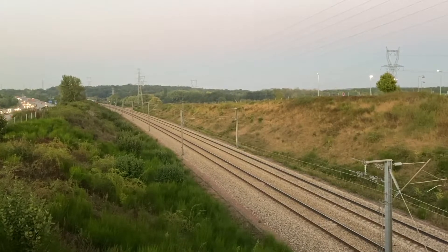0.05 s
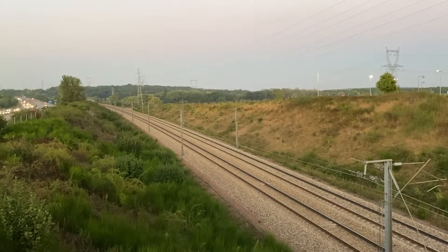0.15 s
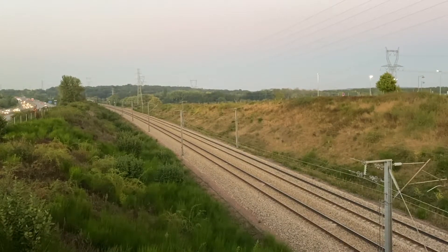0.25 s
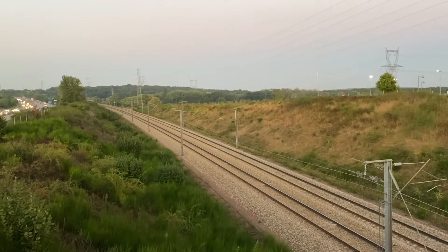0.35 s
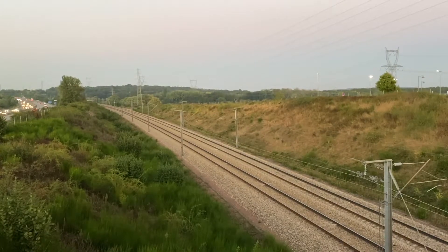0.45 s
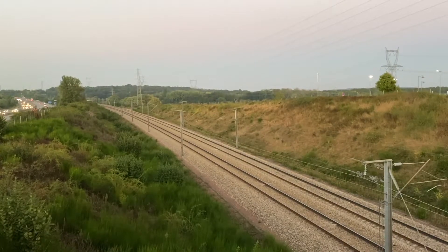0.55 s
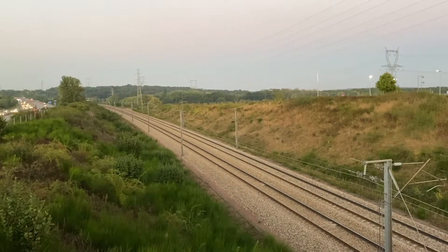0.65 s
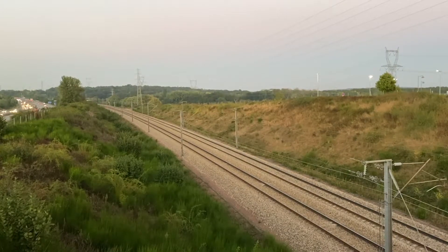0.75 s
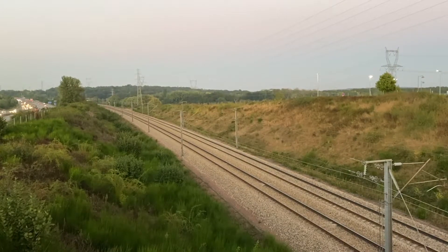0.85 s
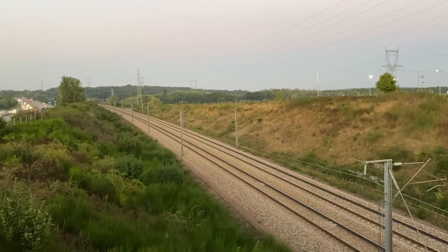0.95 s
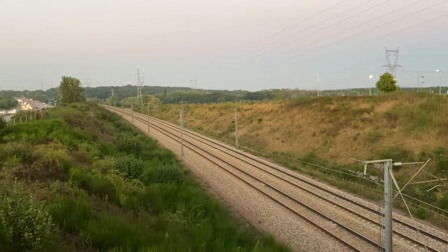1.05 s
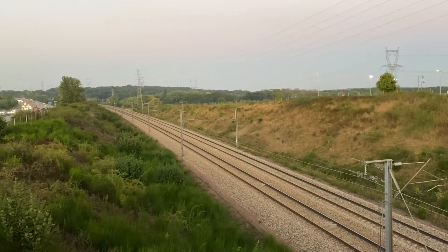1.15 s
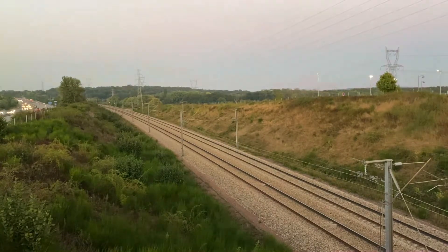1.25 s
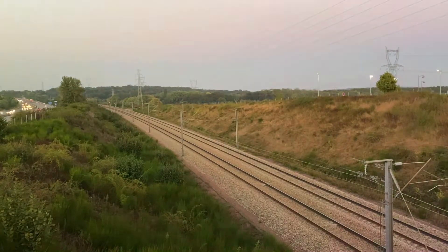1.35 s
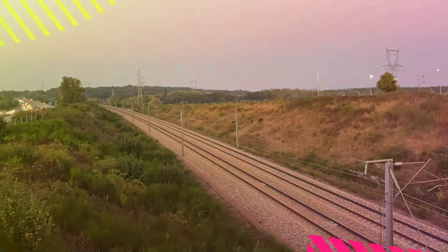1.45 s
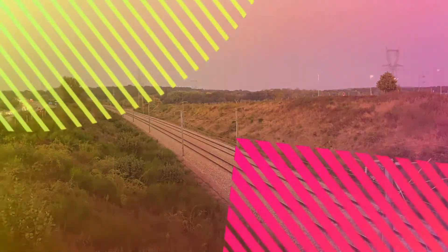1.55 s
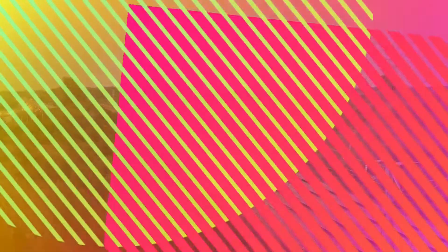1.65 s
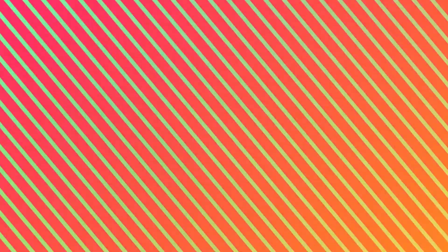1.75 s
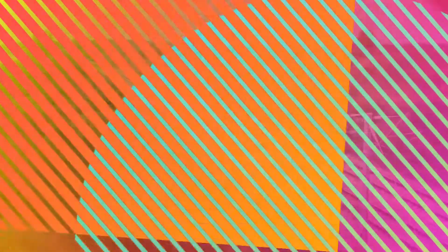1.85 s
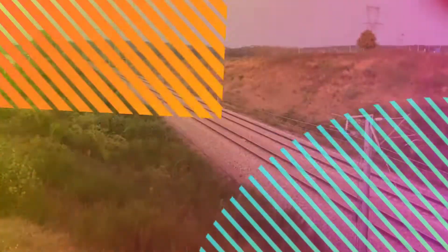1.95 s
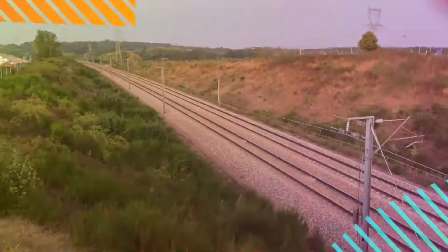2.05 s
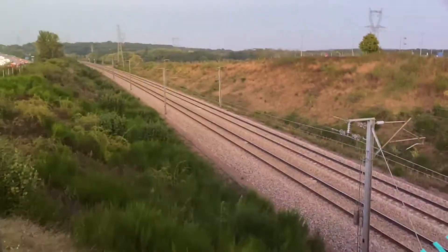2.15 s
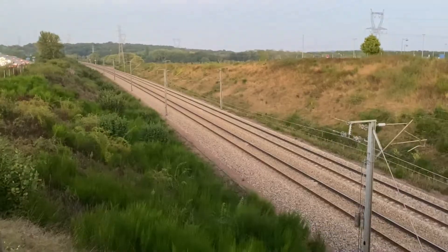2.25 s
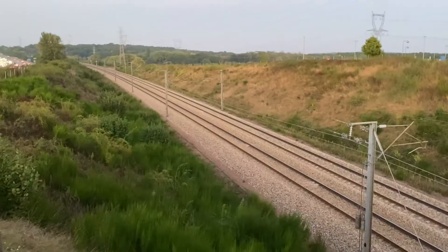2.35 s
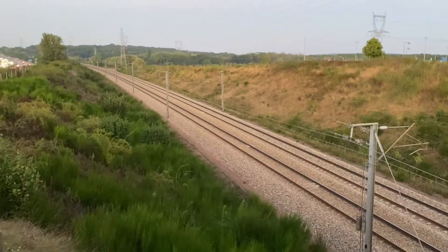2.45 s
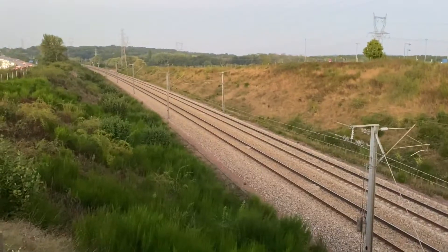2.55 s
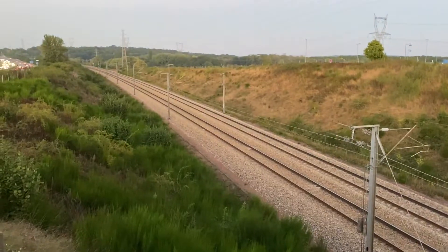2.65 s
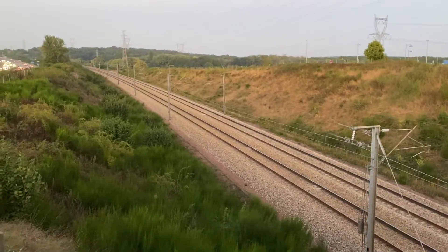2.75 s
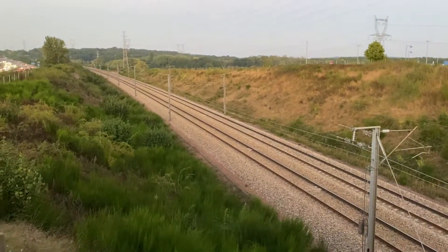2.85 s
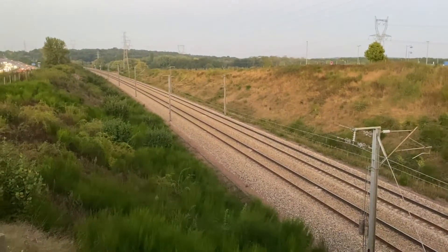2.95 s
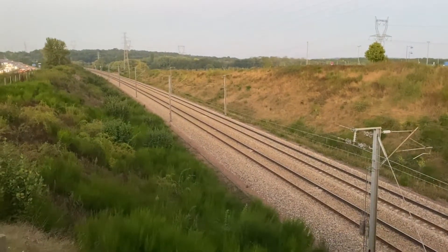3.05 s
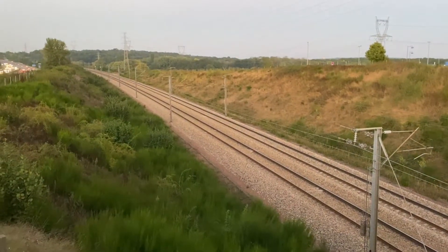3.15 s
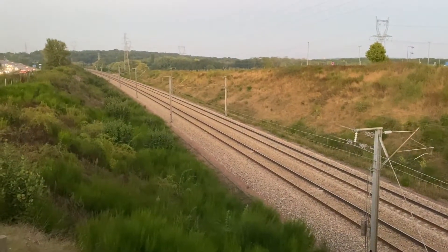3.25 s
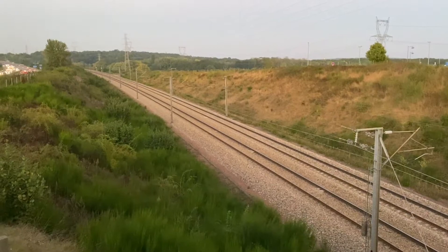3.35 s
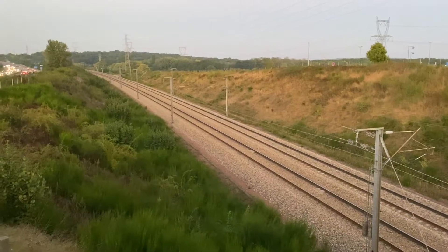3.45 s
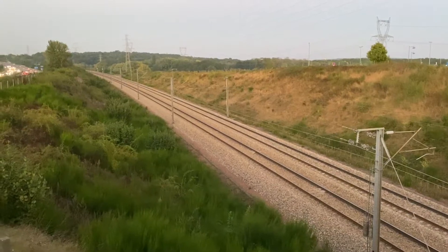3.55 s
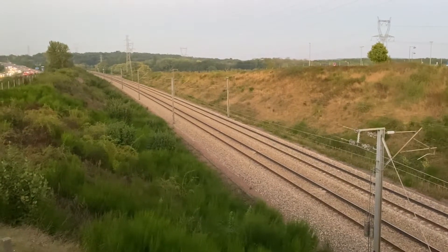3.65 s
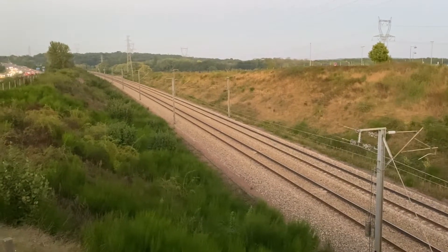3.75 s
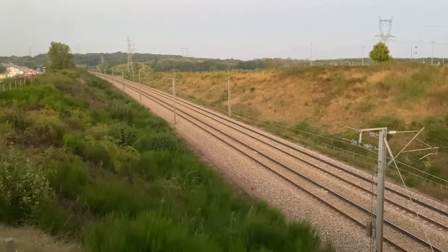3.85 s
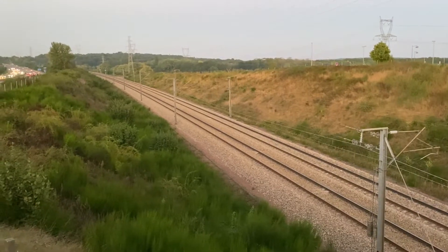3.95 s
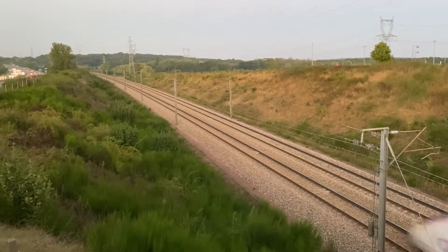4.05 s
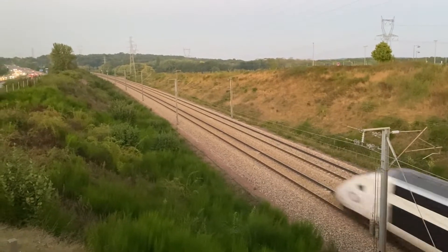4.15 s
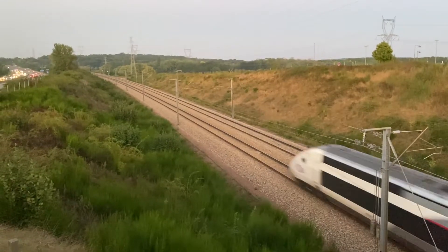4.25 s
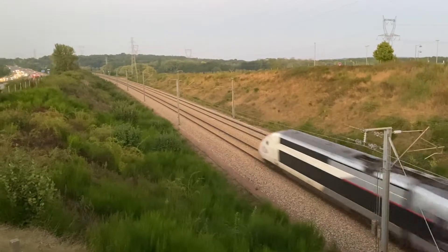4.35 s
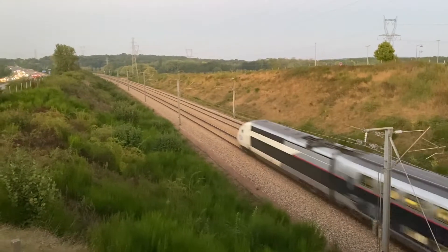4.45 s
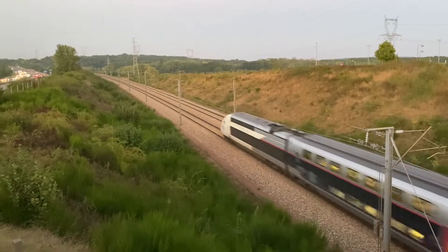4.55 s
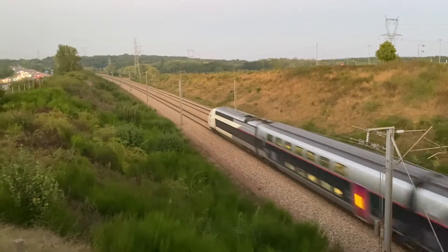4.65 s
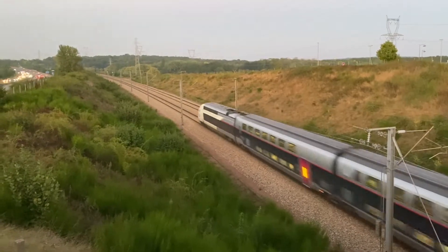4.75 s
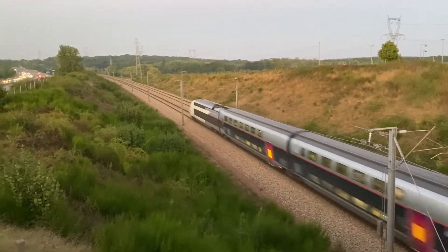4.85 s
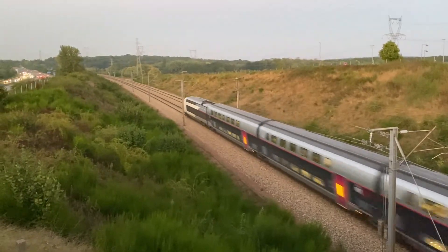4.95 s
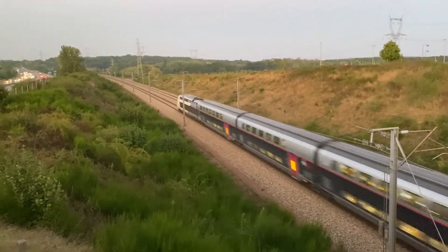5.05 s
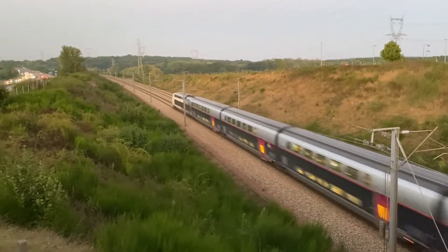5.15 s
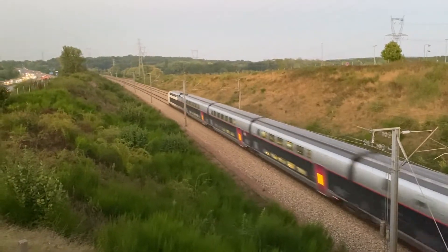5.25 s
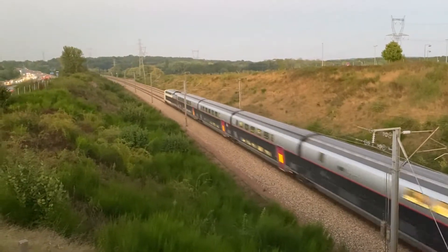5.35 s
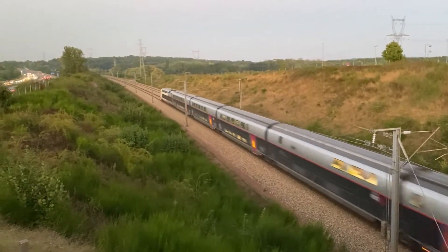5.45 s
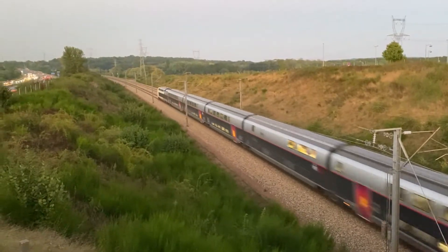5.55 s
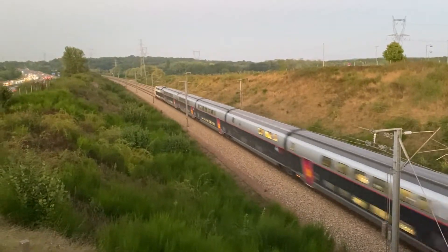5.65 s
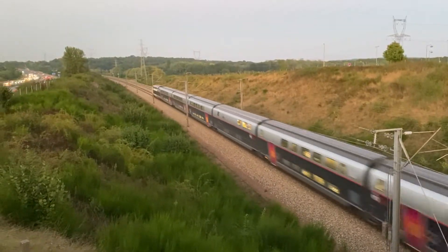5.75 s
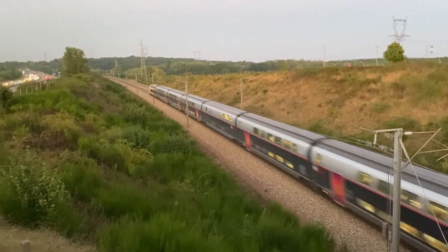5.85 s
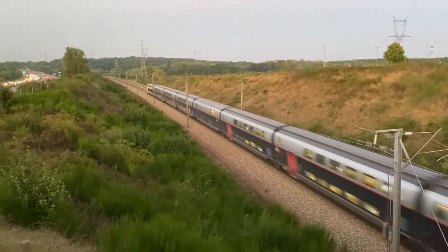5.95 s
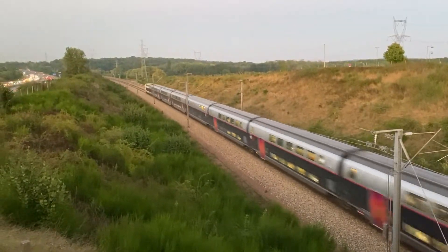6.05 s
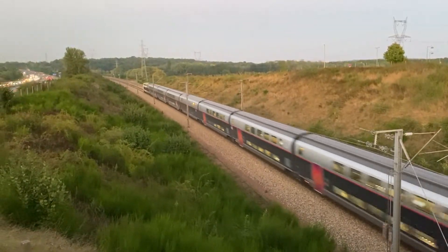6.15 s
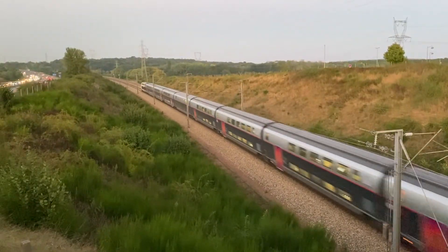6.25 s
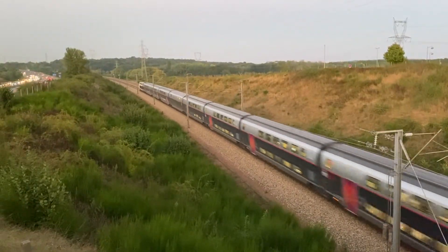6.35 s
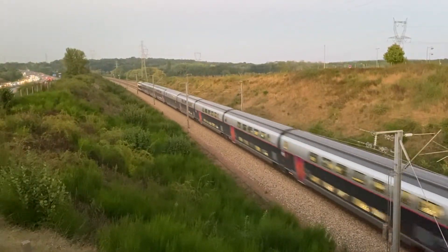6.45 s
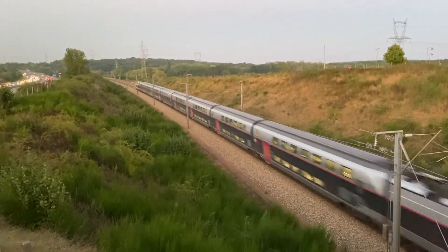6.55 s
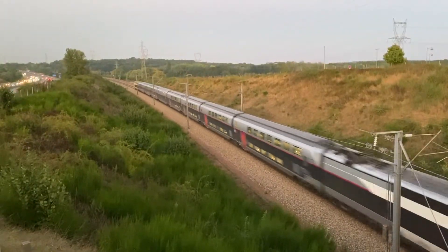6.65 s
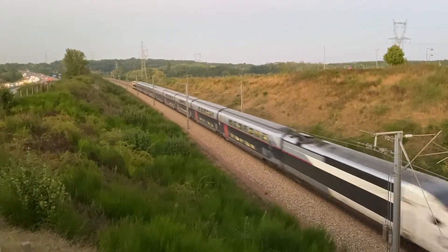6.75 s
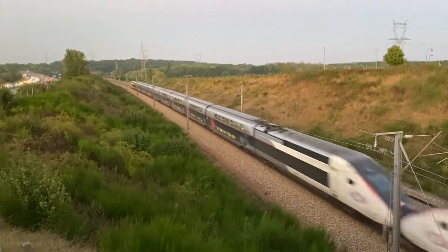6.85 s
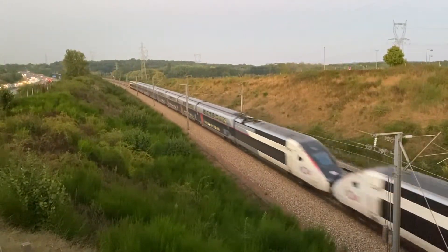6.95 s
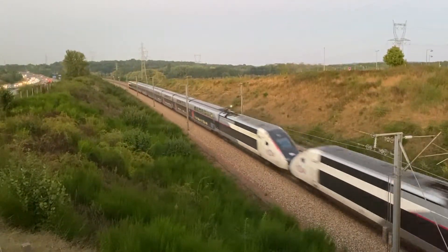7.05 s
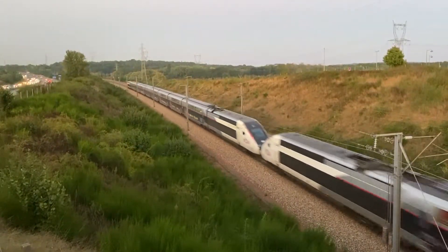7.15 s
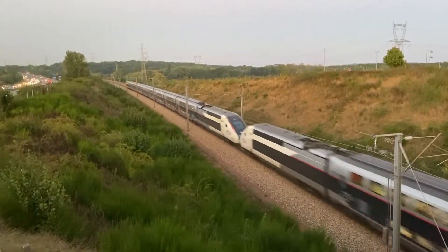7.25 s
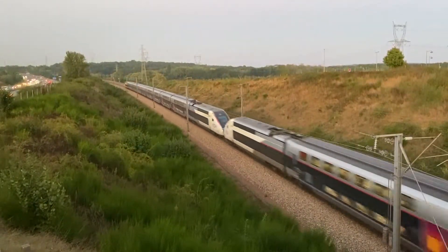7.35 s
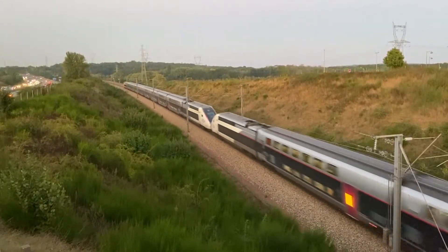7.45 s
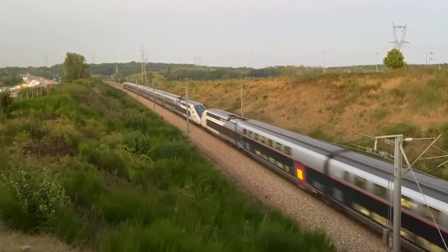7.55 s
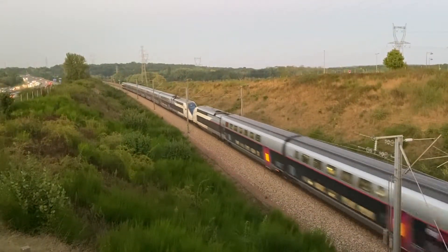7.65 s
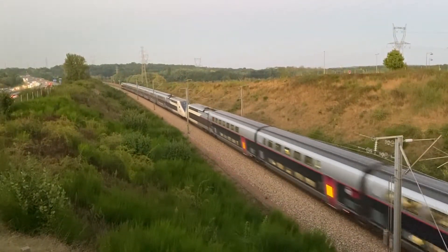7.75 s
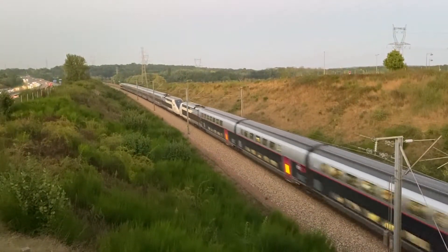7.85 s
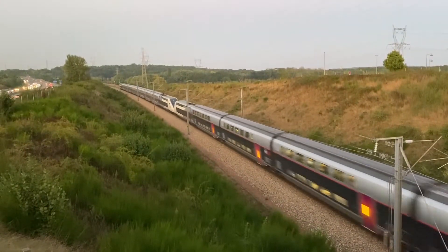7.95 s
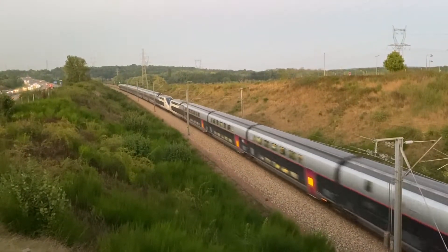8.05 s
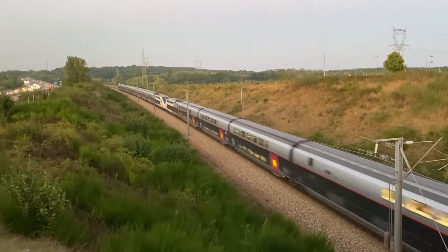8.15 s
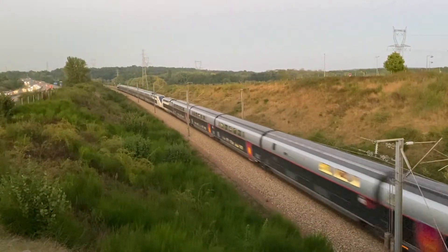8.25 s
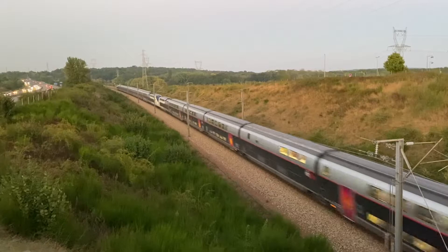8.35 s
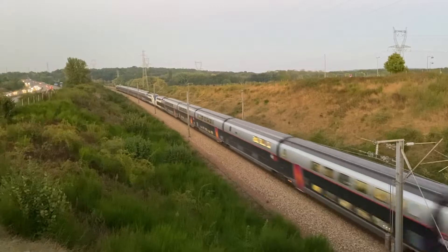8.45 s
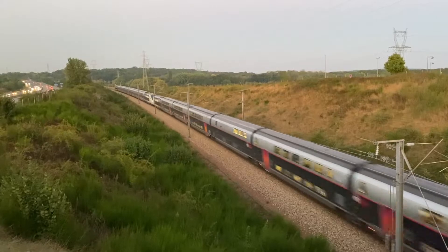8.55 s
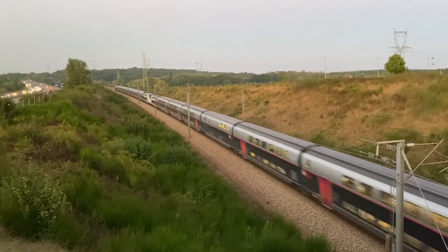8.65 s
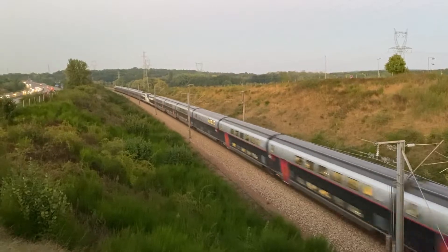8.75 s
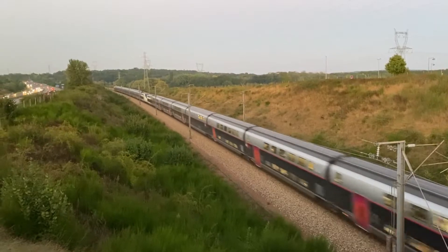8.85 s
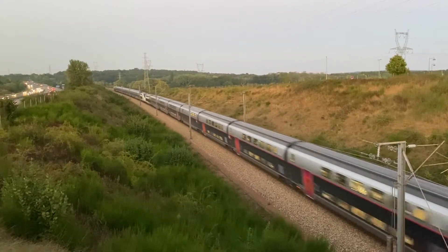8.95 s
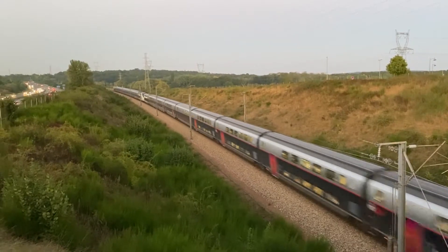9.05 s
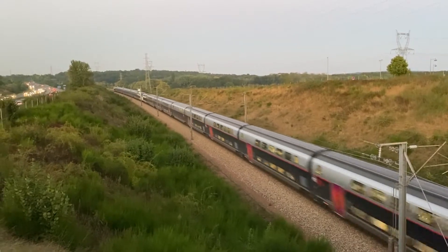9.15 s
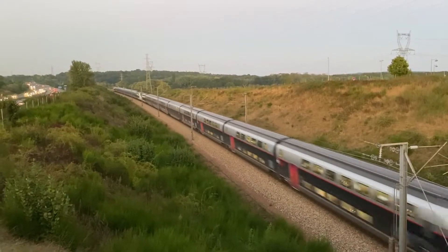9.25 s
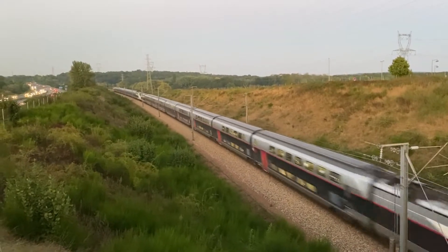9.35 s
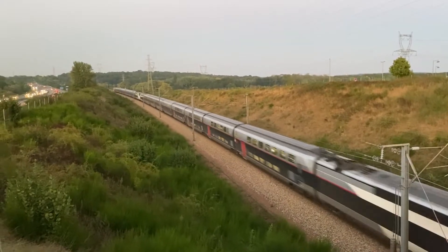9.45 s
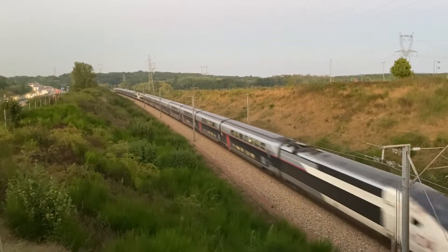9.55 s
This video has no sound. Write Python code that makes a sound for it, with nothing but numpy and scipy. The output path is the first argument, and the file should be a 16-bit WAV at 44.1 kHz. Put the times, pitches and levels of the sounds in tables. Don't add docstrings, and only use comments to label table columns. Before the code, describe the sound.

Distant traffic wash, then thin metallic rail singing, a falling howl, and a long fast train roaring by with squealing, thumping wheels.

```python
import sys
import numpy as np
from scipy import signal
from scipy.fft import rfft, irfft, next_fast_len
from scipy.io import wavfile
from scipy.ndimage import uniform_filter1d, minimum_filter1d

SR = 44100
rng = np.random.default_rng(int(sys.argv[2]) if len(sys.argv) > 2 else 0)


def generate_wav(sig):
    pcm = np.round(np.clip(np.atleast_2d(sig).T, -1, 1) * 32767).astype(np.int16)
    wavfile.write(sys.argv[1], SR, pcm)


def magnitude_from_level(level_db):
    exponent = np.asarray(level_db, float) / 20
    return 10 ** exponent


N = 423360
HOP = 128
WINDOW = 8 * HOP
FRAMES = np.arange(N // HOP + 5) * HOP / SR
BINS = np.fft.rfftfreq(WINDOW, 1 / SR)
CHANGE_S, CHANGE_OUT_S, CHANGE_IN_S = 1.768, .024, .028


def evened(x):
    return x / np.sqrt(np.mean(x ** 2) + 1e-20)


def read(points, column=1):
    rows = np.transpose(points)
    return np.interp(np.log(BINS + 1), np.log(rows[0] + 1), rows[column])[:, None]


def follow(rows, column=1, rise_s=0.0089):
    rows = np.transpose(rows)
    t = np.arange(N) / SR
    fade_in = np.clip((t - rows[0, 0]) / rise_s + .5, 0, 1)
    return magnitude_from_level(np.interp(t, rows[0], rows[column])) * fade_in


def per_sample(frame_gain):
    return np.interp(np.arange(N) / SR, FRAMES, frame_gain)


def tilted(x, above_hz, gain):
    highpass = signal.butter(2, above_hz, "high", fs=SR, output="sos")
    return x + (gain - 1) * signal.sosfiltfilt(highpass, x)


def ports(left, other, table):
    same = np.clip(read(table, column=1), 0, 1)
    lead = np.exp(1j * read(table, column=2))
    right = (same * left + np.sqrt(1 - same ** 2) * other) * lead
    balance = magnitude_from_level(read(table, column=3) / 2)
    pair = np.array([left * balance, right / balance])
    return signal.istft(pair, nperseg=WINDOW, noverlap=WINDOW - HOP)[1][:, :N]


def placed(mono, table):
    z = signal.stft(mono, nperseg=WINDOW, noverlap=WINDOW - HOP)[2]
    return ports(z, 0, [(hz, 1, lead, balance) for hz, _, lead, balance in table])


def wash(colour, table, patchy_db, flicker_db):
    a, b, c, d, patches = rng.standard_normal((len(FRAMES), len(BINS), 5), dtype=np.float32).T
    patches = uniform_filter1d(patches, size=14, axis=0)
    patches = evened(uniform_filter1d(patches, size=24, axis=1))
    flicker = evened(uniform_filter1d(rng.standard_normal(len(FRAMES)), size=10))
    size = magnitude_from_level(read(colour) + patchy_db * patches + flicker_db * flicker)
    return evened(ports(size * (a + 1j * b), size * (c + 1j * d), table))


def whistle(hz, width_hz, steady):
    r = np.exp(-np.pi * width_hz / SR)
    noise = rng.standard_normal((len(hz), 2)) @ [1, 1j]
    slow = signal.lfilter([1], [1, -2 * r, r * r], noise)
    slow = steady + slow / np.sqrt(np.mean(abs(slow) ** 2))
    carrier = np.exp(2j * np.pi * np.cumsum(hz) / SR)
    return evened((slow * carrier).real)


def glides(events, width_hz, fall):
    out = np.zeros(N)
    for s, length_s, first_hz, db in events:
        count = round(length_s * SR)
        hz = first_hz * (1 - fall * np.arange(count) / SR)
        tone = whistle(hz, width_hz, steady=30 / width_hz)
        out[round(s * SR):][:count] += magnitude_from_level(db) * np.hanning(count) * tone
    return out


def swells(at_s, lift_db, rise_s, fall_s):
    late = FRAMES[:, None] - at_s
    bells = np.exp(-.5 * (late / np.where(late < 0, rise_s, fall_s)) ** 2)
    return (lift_db * bells).sum(1)


# (time [s], rise [s], fall [s], air lift [dB], wheel lift [dB])
POWER_CARS = [
    (4.076, .28, .28, 7.5, -0.5),
    (6.554, 0.16, 0.18, 5.5, 4),
    (9.284, 0.13, 0.22, 5.5, 6.5),
]
# (time [s], rolling lift [dB], fizz lift [dB])
BOGIES = [(4.0, 2.5, 3.5), (4.17, 1.5, 1), (4.47, 1.5, 0.5), (4.8, 2.5, 1.5), (5.02, 2.5, 2.5),
          (5.13, 1, 0.5), (5.3, 1.5, 2), (5.52, 2.5, 3), (5.79, 2.5, 4), (6.1, 4, 5), (6.4, 1, 2),
          (6.65, 2, 0.5), (6.91, 1.5, 1.5), (7.3, 3, 2), (7.54, 1, 2), (7.81, 0.5, 4.5), (8.07, 2.5, 1),
          (8.36, 2.5, 0.5), (8.62, 2, 1), (8.8, 2.5, 3.5), (9.08, 0.5, 3.5), (9.35, -0.5, 2)]
# (time [s], lift [dB], rise [s], fall [s])
ROOF_GEAR = [
    (4.33, 6.5, 0.33, 0.2),
    (6.72, 6.5, 0.33, 0.47),
    (9.5, 6, 0.29, .3),
]


def passing(coach_db, approach_db, hidden_db, sag_db, air, wheels, lag_s, stretch, bogies,
            bright=False, gear=0):
    emerge_s, emerge_rise_s = 3.877, 0.014
    since = FRAMES - emerge_s
    db = coach_db + np.where(since < 0, approach_db * since, -sag_db * since)
    db -= hidden_db * (1 - np.tanh(since / emerge_rise_s)) / 2
    at, rise, fall, air_db, wheel_db = np.transpose(POWER_CARS)
    db += swells(at + lag_s, air * air_db + wheels * wheel_db, stretch * rise, stretch * fall)
    at, roll_db, fizz_db = np.transpose(BOGIES)
    db += bogies * swells(at, fizz_db if bright else roll_db, rise_s=0.037, fall_s=0.11)
    at, gear_db, rise, fall = np.transpose(ROOF_GEAR)
    db += gear * swells(at, gear_db, rise, fall)
    return per_sample(magnitude_from_level(db) * (FRAMES > CHANGE_S))


# (time [s], level [dB], treble lift [dB])
ROAD = [(0, -33.5, 3.5), (.85, -34.5, 3), (1.3, -34, 2.5), (1.76, -34.5, 0.5), (1.79, -35, 3.5),
        (2.05, -34.5, 8.5), (2.3, -33, 3.5), (2.6, -32, 2), (2.9, -32.5, -2), (3.2, -32.5, 0),
        (3.5, -32, 3.5)]
# (frequency [Hz], level [dB])
ROAD_COLOUR = [(25, -69), (90, -57.5), (350, -63), (700, -58.5), (1000, -53.5), (1300, -59.5),
               (1900, -66.5), (2400, -74.5), (3000, -83.5), (4000, -85.5), (5500, -97.5), (7200, -104),
               (10500, -115), (12500, -121), (16000, -123)]
# (frequency [Hz], likeness [0-1], right lead [rad], left-right [dB])
ROAD_PORTS = [(60, .98, -.1, 1.5), (300, .6, -.4, 1.6), (500, .76, -1.1, 4), (850, .75, -2, 7),
              (1300, .86, -2.6, .3), (1550, .7, -3.2, .3), (2000, .4, -5.3, 2.5), (2400, .83, -6.6, 6),
              (2800, .25, -5.5, 5.5), (3500, .75, -6.1, 1.2), (4500, .4, -6.9, 3.5), (5100, .1, -7.5, 6.5),
              (6300, .6, -6.3, .3), (7400, .5, -4.8, 0)]


def road():
    rows = ROAD + [(4.2, -42, 0)]
    x = wash(ROAD_COLOUR, ROAD_PORTS, patchy_db=1.18, flicker_db=-0.05)
    return magnitude_from_level(6.5) * follow(rows) * tilted(x, 1900, follow(rows, column=2))


# (time [s], length [s], frequency [Hz], level [dB])
JOINTS = [
    (1.945, .05, 4200, -58),
    (2.035, 0.058, 4500, -53),
    (2.11, .032, 4100, -57),
]


def road_joints():
    return glides(JOINTS, width_hz=1800, fall=.9)


# (time [s], peak [dB])
TICKS = [(0.1765, -75), (0.3835, -74), (0.4389, -57), (0.4534, -54), (0.4663, -50), (0.4903, -64),
         (0.5018, -63), (0.7846, -80.5), (0.8255, -56), (0.8445, -66), (0.8572, -52), (0.8842, -53),
         (1.5204, -67), (1.7504, -67), (1.7823, -63)]


def insect():
    echo_s, echo_db = .003, -9
    out = np.zeros(N)
    t = np.arange(200) / SR
    ring = np.exp(-t * 2200) * np.sin(2 * np.pi * 15100 * t) * np.minimum(t * 9000, 1)
    for s, db in TICKS:
        out[round(s * SR):][:len(t)] += magnitude_from_level(db + 10.0) * ring
    return out + magnitude_from_level(echo_db) * np.roll(out, round(echo_s * SR))


# (time [s], level [dB])
LORRIES = [(0, -42), (.9, -39.5), (1.3, -36), (1.76, -37), (2.3, -36), (9.6, -37.5)]
# (time [s], lift [dB])
SURGES = [(.1, 12), (.5, 9), (1.3, -2), (1.6, 4), (1.85, 3), (2.11, 6), (2.92, 2), (3.35, 3.5), (3.63, 8),
          (4.02, 4), (4.42, 4), (4.8, 4), (4.95, 4.5), (5.14, 3), (5.25, 0), (5.42, 2), (5.7, 3), (6.04, 4),
          (6.4, 2), (6.66, 3), (6.86, -6), (7.3, 2), (7.82, 1), (8.28, 3.5), (8.62, 4), (9.1, -10),
          (9.32, 3), (9.55, -14)]


def drone():
    hum = whistle(np.full(N, 63), width_hz=48, steady=0)
    ground = passing(coach_db=-26, approach_db=8, hidden_db=-1.0, sag_db=0.8, air=0.41, wheels=.05,
                     lag_s=-0.2, stretch=1.2, bogies=.1)
    surge = magnitude_from_level(swells(*np.transpose(SURGES), rise_s=0.051, fall_s=0.051))
    level = np.hypot(follow(LORRIES), ground) * per_sample(surge)
    return level * hum * magnitude_from_level(np.array([[1.3], [-1.3]]))


# (frequency [Hz], width [Hz], level [dB])
RAIL_MODES = [(3833, 30, -15), (5434, 30, -6), (5559, 24, 0), (6350, 110, -3), (7045, 25, -8),
              (7630, 70, -3), (7921, 18, -3), (9500, 40, -3), (10900, 80, 3), (11450, 60, -5),
              (12500, 80, 10), (14050, 130, 3), (15540, 60, -14), (12200, 1400, 6.5), (14600, 1400, 3)]
# (time [s], modes above 9 kHz [dB], modes below [dB])
RAIL_SWELL = [(1.77, -79, -95), (2.3, -75, -86), (2.8, -70, -73), (3.2, -64.5, -67), (3.6, -60, -60),
              (3.85, -67, -49), (4.0, -75, -75)]


def rails():
    span = slice(round(1.7 * SR), round(4.1 * SR))
    high = follow(RAIL_SWELL)[span]
    low = follow(RAIL_SWELL, column=2)[span]
    out = np.zeros(N)
    for hz, width_hz, db in RAIL_MODES:
        ring = whistle(np.full(span.stop - span.start, hz), width_hz, steady=26 / width_hz)
        out[span] += magnitude_from_level(db) * (high if hz > 9000 else low) * ring
    return out


# (time [s], frequency [Hz], level [dB])
NOSE_HOWL = [(3.35, 400, -50), (3.5, 388, -38), (3.62, 380, -43), (3.72, 368, -35), (3.82, 336, -28),
             (3.92, 308, -23.5), (3.98, 292, -30), (4.08, 300, -36), (4.16, 290, -25), (4.3, 250, -27),
             (4.38, 235, -50)]
# (time [s], length [s], frequency [Hz], level [dB])
NOSE_MOANS = [
    (3.5, 0.13, 195, -21),
    (3.97, 0.098, 280, -22),
    (4.12, 0.11, 520, -31),
    (4.1, 0.17, 130, -23),
]


def nose():
    at, hz, _ = np.transpose(NOSE_HOWL)
    t = np.arange(N) / SR
    level = follow(NOSE_HOWL, column=2) * (t < at[-1])
    howl = level * whistle(np.interp(t, at, hz), width_hz=30, steady=1.1)
    return howl + glides(NOSE_MOANS, width_hz=31, fall=0.64)


# (time [s], length [s], frequency [Hz], level [dB])
BUFFETS = [(3.86, 0.36, 603, -25.5), (3.9, 0.25, 950, -30), (4.1, 0.27, 520, -23.5), (4.3, 0.3, 801, -30.5),
           (3.6, 0.21, 800, -31), (6.31, 0.12, 437.4, -27), (6.42, 0.19, 986, -28), (6.76, 0.12, 1116, -23),
           (7.05, 0.21, 1094, -28), (8.28, 0.33, 720, -28), (8.55, .2, 722, -29), (9.17, 0.22, 520, -29)]
# (time [s], length [s], frequency [Hz], level [dB])
GUSTS = [(4.22, 0.36, 1342, -25), (4.44, .14, 3600, -35), (4.77, 0.09, 4080, -37), (4.96, 0.21, 2200, -30),
         (5.0, 0.13, 3370, -41), (5.07, 0.1, 4600, -33), (5.27, .14, 4200, -42), (6.55, 0.25, 4400, -41)]


def buffeting():
    return glides(BUFFETS, width_hz=320, fall=0.204) + glides(GUSTS, width_hz=330, fall=0.78)


# (time [s], length [s], frequency [Hz], level [dB])
FANS = [
    (3.9, 0.18, 1216, -25),
    (4.1, 0.39, 1217, -23),
    (6.45, 0.4, 1230, -24),
    (9.17, 0.15, 1236, -27),
    (9.36, 0.21, 1200, -27),
]


def fans():
    return glides(FANS, width_hz=150, fall=0.049)


# (time [s], length [s], frequency [Hz], level [dB])
SINGS = [(3.91, 0.16, 6300, -37), (3.99, 0.082, 7450, -41), (4.14, .14, 7660, -39), (4.95, .16, 7500, -44),
         (5.06, .14, 7200, -48), (5.16, .12, 6800, -40), (5.24, .12, 8050, -44), (5.3, 0.15, 7250, -41),
         (5.42, .1, 7950, -43), (5.5, .14, 8700, -38), (5.52, 0.18, 7300, -36), (5.66, 0.16, 6900, -40),
         (5.75, 0.13, 6650, -41), (5.75, 0.15, 7750, -38), (5.95, 0.16, 7960, -37), (6.04, 0.16, 7320, -37),
         (6.2, 0.13, 6800, -42), (6.33, .08, 6600, -44), (6.52, 0.11, 6750, -44), (6.92, .16, 7750, -42),
         (7.24, 0.12, 7670, -38), (7.52, .1, 7850, -46), (7.56, 0.13, 7460, -40), (7.72, .1, 6920, -41),
         (7.76, .16, 7530, -47), (8.73, .1, 7950, -49), (8.81, .1, 7360, -41), (8.87, 0.11, 7450, -39),
         (9.03, .12, 7600, -48), (9.05, .09, 6650, -47), (9.2, .12, 7400, -43), (9.29, .12, 6770, -44),
         (9.45, 0.12, 7100, -42)]
# (time [s], length [s], frequency [Hz], level [dB])
SQUEALS = [(4.1, 0.11, 3250, -33), (4.43, 0.11, 3160, -30), (4.82, .09, 3030, -39), (4.97, .12, 3210, -31),
           (5.04, 0.089, 3600, -36), (5.23, .09, 3270, -35), (5.45, 0.12, 3350, -35),
           (5.77, 0.055, 3260, -31), (6.01, 0.084, 3170, -31), (6.08, .1, 3550, -34),
           (6.38, .075, 3180, -33), (6.53, 0.088, 3300, -38), (6.61, 0.12, 3180, -32),
           (7.25, 0.11, 3330, -32), (7.72, 0.086, 3340, -36), (7.76, 0.1, 3230, -32),
           (8.0, 0.091, 3240, -38), (8.32, 0.082, 3200, -33), (8.75, 0.099, 3300, -38),
           (9.03, 0.088, 3280, -33), (9.33, .09, 3200, -34)]
# (time [s], length [s], frequency [Hz], level [dB])
RINGS = [(4.82, .16, 2440, -36), (5.25, .09, 2520, -36), (5.97, 0.098, 2520, -35), (6.86, 0.12, 2650, -34),
         (6.99, 0.19, 2560, -43), (7.07, 0.09, 2560, -35), (7.28, .14, 2890, -35), (7.39, .16, 2520, -38),
         (7.75, 0.078, 2560, -38), (7.88, .07, 2520, -40), (8.23, .12, 2560, -39.5), (8.8, .08, 2930, -42)]


def rims():
    sing = glides(SINGS, width_hz=410, fall=.4)
    squeal = glides(SQUEALS, width_hz=220, fall=1.3)
    return sing + squeal + glides(RINGS, width_hz=36, fall=0.077)


# (time [s], length [s], frequency [Hz], level [dB])
THUMPS = [(5.86, 0.085, 920, -26), (5.87, .07, 703, -26), (5.94, 0.064, 900, -23), (6.05, 0.1, 785, -23),
          (6.12, 0.1, 1010, -20.5), (6.12, 0.095, 710, -22.5), (6.23, .06, 1012, -25),
          (6.35, 0.079, 930, -26), (6.4, .08, 700, -24), (6.53, 0.086, 980, -28), (6.7, 0.063, 950, -23),
          (6.83, 0.097, 930, -24), (7.58, 0.04, 900, -36), (8.1, 0.096, 1000, -31), (8.8, 0.074, 894, -28)]
# (time [s], length [s], frequency [Hz], level [dB])
KNOCKS = [
    (3.5705, .007, 880, -17),
]


def impacts():
    return glides(THUMPS, width_hz=190, fall=1.44) + glides(KNOCKS, width_hz=15, fall=8.1)


# (frequency [Hz], level [dB])
RUMBLE_COLOUR = [(20, -8), (60, -8), (110, -3.5), (170, -3), (300, -8.5), (420, -17), (700, -46.5)]
# (frequency [Hz], likeness [0-1], right lead [rad], left-right [dB])
TRAIN_PORTS = [(60, .985, .12, 2.6), (300, .89, .7, 1.6), (450, .7, 1.2, -.3), (1000, .58, 1.6, -1.4),
               (1500, .78, 3.1, .5), (2050, .28, 4.7, -.9), (2450, .58, 6.1, .3), (2720, .08, 5.2, 3.6),
               (3000, .62, 5.2, 1.7), (3600, .78, 5.8, 2.5), (4500, .6, 6.3, 4.2), (5300, .07, 5.7, 5.4),
               (6300, .75, 5.8, 3.2), (7600, .6, 7.7, .6)]


def rumble():
    air = passing(coach_db=-24, approach_db=9.0, hidden_db=0.7, sag_db=0.65, air=0.88, wheels=.01,
                  lag_s=.01, stretch=1.4, bogies=0.2)
    return air * wash(RUMBLE_COLOUR, TRAIN_PORTS, patchy_db=-0.8, flicker_db=-0.5)


# (frequency [Hz], level [dB])
ROAR_COLOUR = [(200, -34), (400, -6), (700, -3.5), (1000, -3), (1200, -6.5), (1360, -4), (1500, -1),
               (1800, -8), (2050, -7.5), (2300, -21), (3000, -37)]


def roar():
    noise = wash(ROAR_COLOUR, TRAIN_PORTS, patchy_db=1.1, flicker_db=.5)
    wake = passing(coach_db=-22, approach_db=28.5, hidden_db=3.0, sag_db=1.19, air=0.045, wheels=0.044,
                   lag_s=.01, stretch=0.83, bogies=0.18, gear=0.71)
    effort = uniform_filter1d(wake, size=9000) / magnitude_from_level(-15.5) + 0.017
    return wake * tilted(noise, 840, effort ** -.4)


# (frequency [Hz], level [dB])
ROLL_COLOUR = [(1500, -28), (2300, -1.5), (2500, -1), (2740, -4), (3000, 0.5), (3500, -1), (3850, -5),
               (4300, -4), (5000, -8.5), (6000, -13), (7000, -34), (9000, -44)]


def rolling():
    roll = passing(coach_db=-27, approach_db=36.5, hidden_db=5.5, sag_db=1.5, air=.02, wheels=0.99,
                   lag_s=0.023, stretch=1.38, bogies=0.96)
    return roll * wash(ROLL_COLOUR, TRAIN_PORTS, patchy_db=0.84, flicker_db=0.35)


# (frequency [Hz], level [dB])
FIZZ_COLOUR = [(7600, -30), (8400, 5), (9000, 4), (10000, -2), (11000, -4), (12000, -2), (13300, -3.5),
               (14500, -2.5), (15500, -16), (16200, -35)]
# (frequency [Hz], level [dB])
LOW_FIZZ_COLOUR = [(5000, -17), (6300, -2.5), (7200, -1), (8000, -2.5), (8800, -7), (10500, -20)]


def fizzing():
    fizz = passing(coach_db=-40.5, approach_db=26, hidden_db=5.5, sag_db=1.0, air=0.38, wheels=.1,
                   lag_s=-.05, stretch=1.0, bogies=0.65, bright=True)
    low_fizz = passing(coach_db=-37, approach_db=39, hidden_db=8, sag_db=0.87, air=0.14, wheels=0.45,
                       lag_s=-0.048, stretch=1.0, bogies=1.0, bright=True)
    upper = fizz * wash(FIZZ_COLOUR, TRAIN_PORTS, patchy_db=0.0, flicker_db=0.9)
    return upper + low_fizz * wash(LOW_FIZZ_COLOUR, TRAIN_PORTS, patchy_db=1.4, flicker_db=0.5)


def scene():
    left = road() + placed(insect() + road_joints(), ROAD_PORTS)
    train = rumble() + roar() + rolling() + fizzing()
    tones = rails() + nose() + buffeting() + fans() + rims() + impacts()
    return left + train + placed(tones, TRAIN_PORTS) + drone()


def limited(x, ceiling):
    room = np.minimum(ceiling / (abs(x).max(0) + 1e-9), 1)
    return x * uniform_filter1d(minimum_filter1d(room, size=601), size=301)


def low_pass(x):
    return signal.sosfilt(signal.butter(12, 16520, fs=SR, output="sos"), x)


def record(dry):
    low_hz, top_hz, side_top_hz = 37.5, 15700, 14800
    side_null_hz, null_spacing_hz = 6860, 4250
    size = next_fast_len(N + 4096)
    hz = np.fft.rfftfreq(size, 1 / SR)
    mic = (hz < top_hz) / np.sqrt(1 + (low_hz / (hz + 1)) ** 6)
    turn = np.pi * (hz - side_null_hz) / null_spacing_hz
    share = np.clip((hz - 6250) / 950, 0, 1)
    leak = .6j * np.clip((8000 - hz) / 700, 0, 1)
    mid_gain = 1 + share * (np.sqrt(2) * np.cos(turn) - 1)
    side_gain = (1 + share * (np.sqrt(2) * np.sin(turn) + leak - 1)) * (hz < side_top_hz)
    mid = irfft(rfft(dry[0] + dry[1], size) * mic * mid_gain, size)[:N] / 2
    side = irfft(rfft(dry[0] - dry[1], size) * mic * side_gain, size)[:N] / 2
    wide = np.array([mid + side, mid - side])
    t = np.arange(N) / SR - CHANGE_S
    wide *= np.clip(np.maximum(-t / CHANGE_OUT_S, t / CHANGE_IN_S), .02, 1)
    return low_pass(limited(wide, ceiling=.88))


dry = scene()
out = record(dry)
generate_wav(out)
```